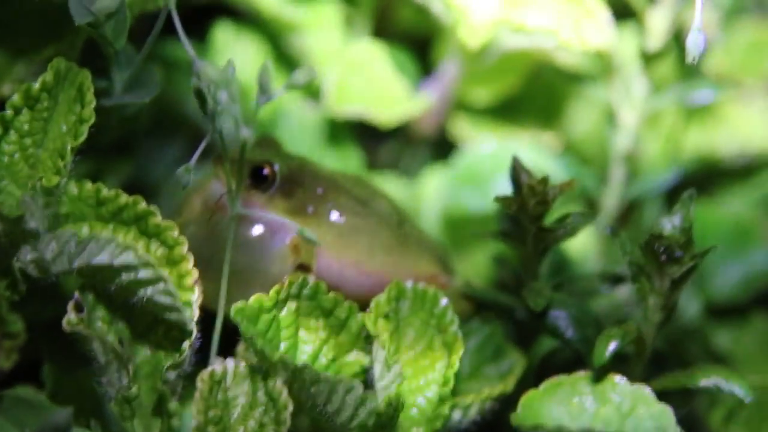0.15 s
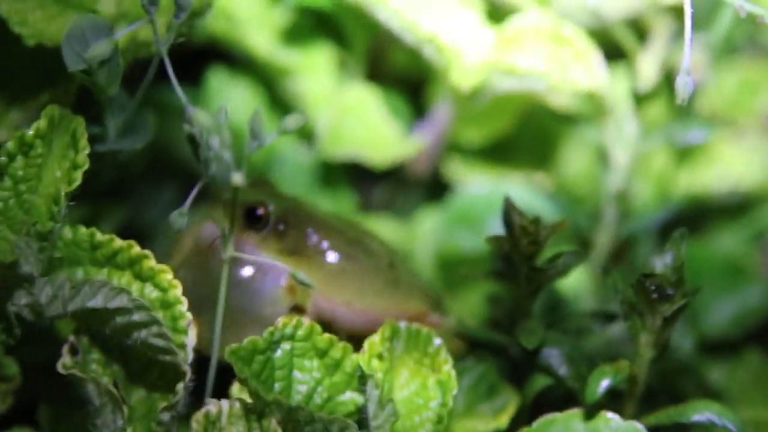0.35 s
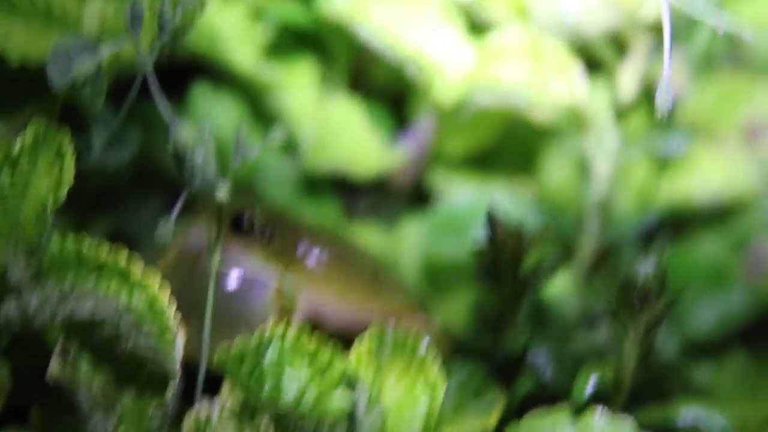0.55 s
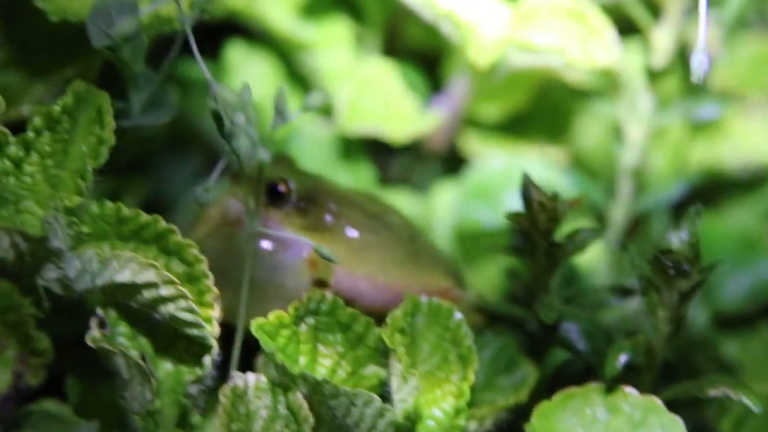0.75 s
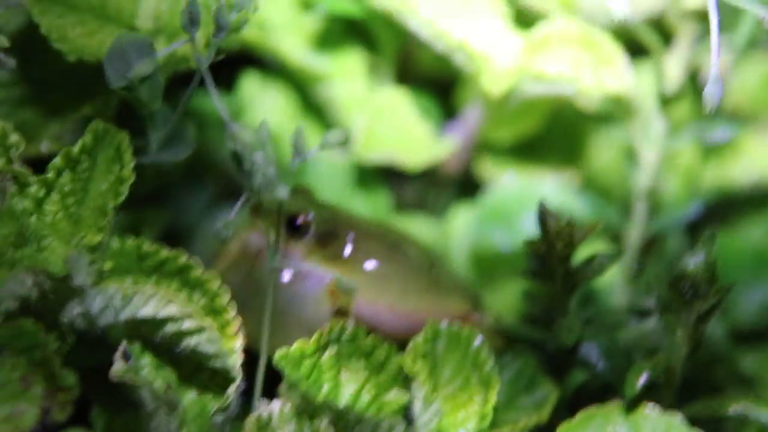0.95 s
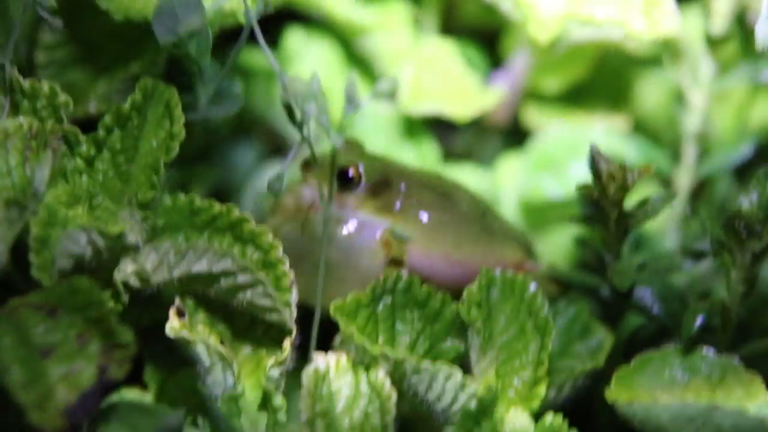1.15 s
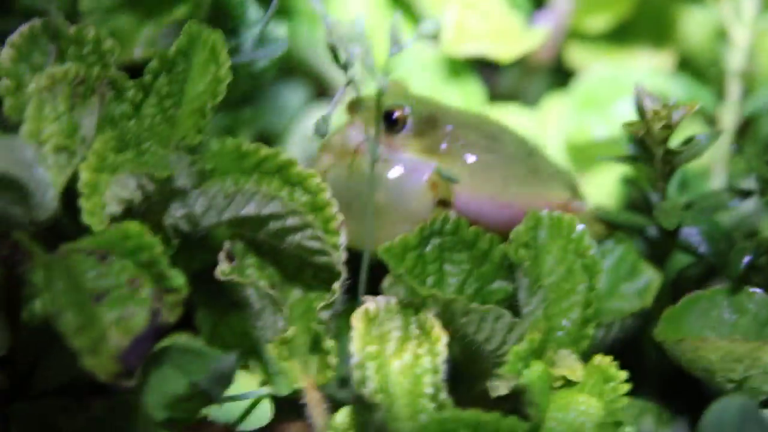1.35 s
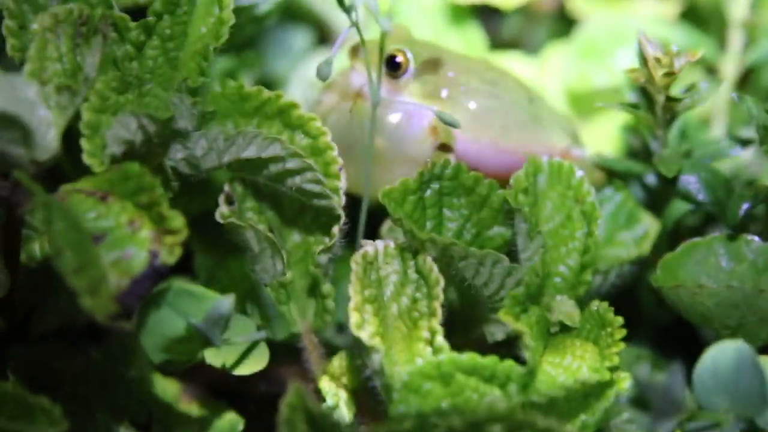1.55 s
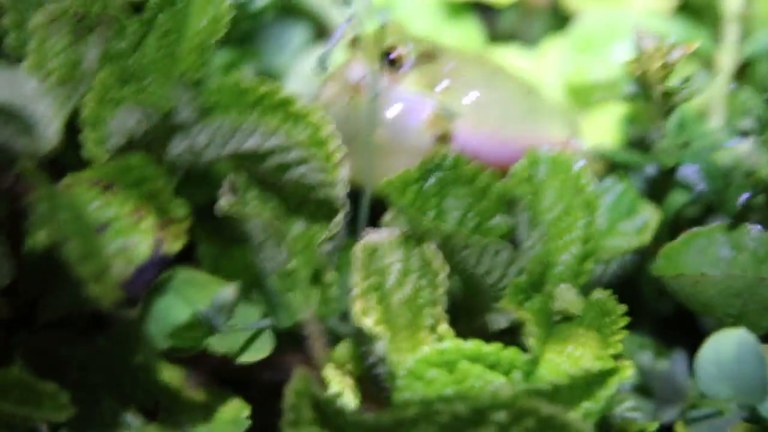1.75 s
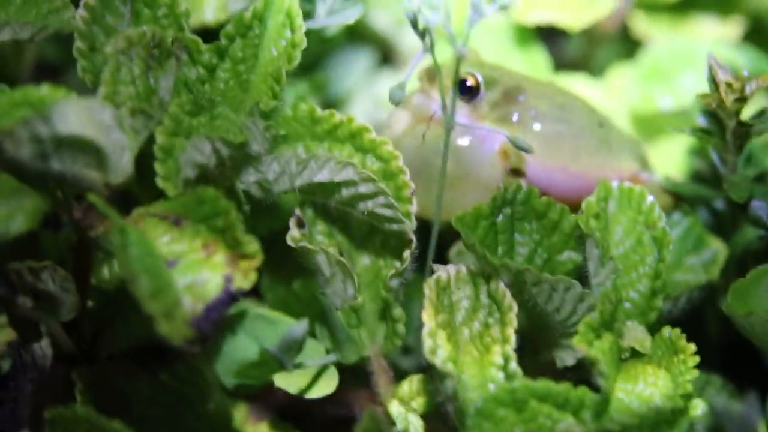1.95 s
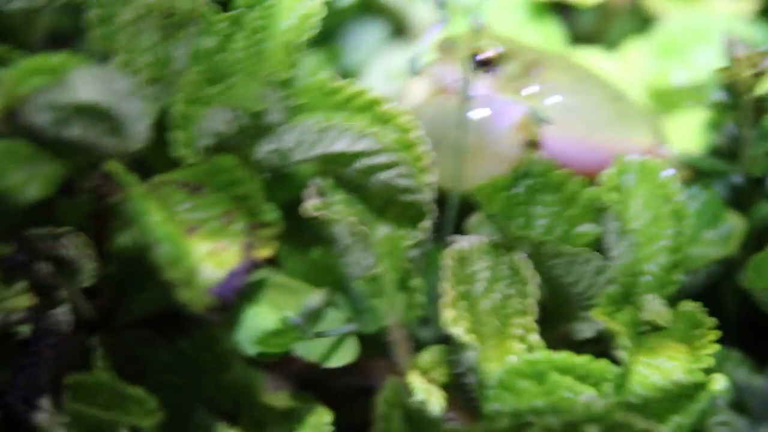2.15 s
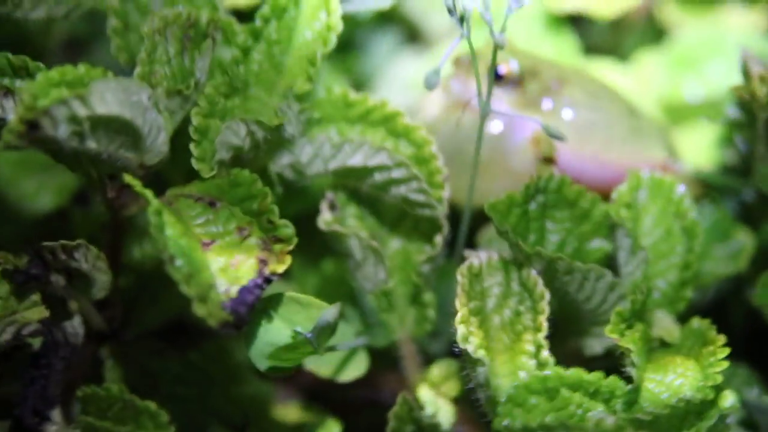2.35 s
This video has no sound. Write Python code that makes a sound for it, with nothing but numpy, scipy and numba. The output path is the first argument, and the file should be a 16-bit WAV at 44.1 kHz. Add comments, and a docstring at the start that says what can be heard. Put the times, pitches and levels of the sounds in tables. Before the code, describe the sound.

A frog gives sharp, high clicking calls up close over faint night frogs and insects.

```python
"""A reed frog calls from the leaves right at the microphone, at night: sharp trains of pulses,
each ringing its vocal sac. Behind it one frog chirps in doubled pulses and another runs on in dry
ticks. A toad snores far off, leaves tick and rustle, and distant frogs and insects make a steady wash.
The first call overloads the recorder, whose gain control ducks the night and slowly lets it back."""
import sys
import numpy as np
from scipy import signal
from scipy.fft import rfft, irfft
from scipy.io import wavfile
from numba import njit

SR = 44100
rng = np.random.default_rng(int(sys.argv[2]) if len(sys.argv) > 2 else 0)


def to_wav(sig):
    """Store sig (one row per channel, or 1-D mono) as 16-bit WAV at the path in sys.argv[1].

    Samples outside -1..1 are clipped; the rate is SR.
    """
    pcm = np.clip(np.atleast_2d(sig), -1, 1) * 32767
    pcm = np.round(pcm).astype(np.int16)
    wavfile.write(sys.argv[1], SR, pcm.T)  # frames by channels


N = 110250

# Reed frog calls, at the microphone and farther off. Each row: start and length in seconds, level in dB,
# pitch and glide in Hz, pulses per second, ring in ms, fade in dB, roughness, overtone boost in dB.
REED_CALLS = [ (0.2495, 0.054, 29.5, 2848, 75, 298, 1.73, -12, 0.16, -1),
              (0.3401, .003, 11, 2700, 15, 290, 2.8, -18, 0.35, 4),
              (0.393, 0.033, 19, 2580, 207, 280, 2.34, -1, 0.21, 5.5),
              (0.4373, 0.0024, 0.5, 2790, -100, 840, 4.5, 10, 0.17, 4),
              (0.52, 0.03, 26, 2830, 21, 380, 1.78, -5.5, 0.09, -8.5),
              (0.567, 0.032, 35.5, 2818, 25, 322, 1.07, -15, 0.08, -3.5),
              (0.8172, 0.023, 22, 2819, 22, 334, 2.55, -2, 0.1, -11),
              (0.8433, 0.027, 32, 2806, 36, 327, 1.1, -9, 0.04, -7),
              (1.2872, 0.012, -1, 2460, 102, 340, 0.99, -2, 1.2, 4),
              (1.3273, 0.025, 9.5, 2517, 147, 320, 4.4, 5, 0.25, -10),
              (2.035, 0.0093, -21, 2500, 0, 330, 1.3, 4, 0.4, 5),
              (2.053, 0.0061, -30, 2620, 2, 160, 1.5, 6, 0, -2),
              (2.125, 0.027, -31.5, 2870, -5, 190, 2.6, -9, 0.4, 0),
              (2.189, 0.039, -28.5, 3030, 2, 320, 1.3, -10, 0.4, -3),
              (2.27, 0.013, -27, 3010, -10, 490, 1.6, 0, 0.4, 0)]
# Harmonics 2 to 5 of a call, in dB before its overtone boost.
REED_HARMONICS_DB = [-34, -42, -44.5, -47]
# A last weak pulse as the throat shuts. Each row: start in seconds, level in dB, pitch in Hz.
CLOSING_PULSES = [(0.3058, 9.5, 2960), (0.5984, 8, 2827), (0.8729, 11.5, 2830)]
# The rasp on the calls. Each row: frequency in Hz, relative level in dB.
RASP_SPECTRUM = [(300, -14.5), (1500, -8), (3000, 15.5), (4300, 3.5), (5600, -1.5), (7000, -5.5),
                 (9500, -8), (14500, -18.5), (17000, -35)]
# The second frog's doubled chirps. Each row: start in seconds, level in dB.
CHIRPS = [(0.6148, -8.5), (0.6427, -10), (0.672, -7), (0.697, -11.5), (0.7147, -10), (0.7342, -9),
          (0.753, -14.5), (0.7734, -10.5), (0.796, -8.5), (0.879, -12), (.898, -10), (0.916, -13.5),
          (0.9317, -12), (.949, -17.5), (.9584, -14.5), (.9708, -14.5), (0.9813, -13), (0.9886, -8),
          (0.9986, -14)]
# The rattle on those chirps. Each row: frequency in Hz, relative level in dB.
RATTLE_SPECTRUM = [(500, -22), (1500, -6), (2300, 0), (4000, -12), (4600, -26), (10000, -27), (16000, -50)]
# The third frog's dry ticks. Each entry: start in seconds.
TICK_STARTS = [1.8488, 1.8745, 1.8986, 1.9228, 1.9451, 1.9705, 1.993, 2.017, 2.042, 2.0659, 2.091, 2.1147,
               2.136, 2.156, 2.179, 2.201, 2.2209, 2.2413, 2.2622, 2.2832, 2.3035, 2.325, 2.3438, 2.3609,
               2.3752, 2.39, 2.4058, 2.4212, 2.439, 2.4564, 2.473, 2.492]
# Its run grows louder. Each row: time in seconds, level in dB.
TICK_LEVELS = [(1.85, -24.5), (2.1, -20.5), (2.33, -18.5), (2.45, -15), (2.5, -15.5)]
# The colour of its ticks. Each row: frequency in Hz, relative level in dB.
TICK_SPECTRUM = [(400, -30), (1300, -22.5), (1650, -2), (1880, -3), (2120, -10), (2600, -6.5), (3100, -10),
                 (4000, -18.5), (4600, -34.5), (9000, -42), (17000, -82)]
# The far toad. Each row: start, end and first pulse gap in seconds, full level in dB, swell in seconds.
SNORE_BOUTS = [(0.013, .3, 0.048, -31.5, 0.0041), (0.725, 1.43, 0.058, -28.5, 0.022),
               (1.799, 2.5, .054, -34, 0.088)]
# The broad croak in each toad pulse. Each row: frequency in Hz, relative level in dB.
CROAK_SPECTRUM = [(300, -34), (450, -18.5), (525, -9), (620, -4.5), (760, -18), (950, 0), (1100, 0.5),
                  (1280, -2), (1550, 7.5), (1750, -4), (1920, -5.5), (2150, -16), (3500, -34.5)]
# The tones each toad pulse rings. Each row: pitch in Hz, relative level in dB, rise and decay in seconds.
TOAD_TONES = [(530.4, -5.5, 0.014, 0.0049), (1043.6, -9, 0.0017, 0.014), (1166, -12, 0.0081, .014),
              (1420, -1, .016, 0.02), (1512, -11, .005, .014), (2690, -16, .008, .014)]
# Single leaf ticks. Each row: start in seconds, level in dB.
LEAF_SNAPS = [(0.0269, -28), (0.1043, -35), (1.23, -27), (1.2416, -42), (1.2745, -31), (1.2822, -22.5),
              (1.305, -33), (1.309, -24), (1.387, -25), (1.4671, -24), (1.5485, -27.5), (1.6213, -37),
              (2.1107, -31.5), (2.266, -33.5), (2.3462, -34)]
# Their colour. Each row: frequency in Hz, relative level in dB.
LEAF_SPECTRUM = [(300, -57), (2000, 18.5), (4200, 7.5), (6000, 2), (10000, 2.5), (15000, -19), (16500, -34)]
# One soft rustle in the leaves. Each row: time in seconds, level in dB.
RUSTLE_LEVELS = [(1.3, -70.5), (1.58, -50.5), (1.7, -42), (1.76, -50.5), (1.81, -45), (1.9, -59),
                 (2.12, -57), (2.5, -62.5)]
# Its colour. Each row: frequency in Hz, relative level in dB.
RUSTLE_SPECTRUM = [(1000, -16.5), (4500, -5), (8000, -1), (11000, -5), (15000, -11.5), (16500, -48.5)]
# The wash of distant frogs, insects and rumble. Each row: frequency in Hz, relative level in dB.
NIGHT_SPECTRUM = [(20, -28), (55, -3.5), (110, -0.5), (200, 3), (350, -4.5), (750, -8), (1400, -4),
                  (2100, -13), (2700, -5), (3500, -18), (4400, -21.5), (5100, -25.5), (5900, -28.5),
                  (11500, -33.5), (15500, -41.5), (16500, -62.5)]
# Thin whistles. Each row: start and length in seconds, lowest pitch and bend scale in Hz, level in dB.
HIGH_WHISTLES = [(0.993, 0.058, 12700, 2900, -55), (1.141, 0.1, 10580, 2010, -55),
                 (2.189, 0.055, 11050, 3820, -47), (2.348, 0.055, 11150, 2800, -49)]

PULSE_ROUNDING = 1.6  # the near frogs' pulses die away in a half bell shape


def reed_call(length, db, hz, glide_hz, rate, ring_ms, fade_db, roughness, overtones_db):
    """A quick train of rounded pulses, each ringing the vocal sac; rough calls slip out of phase."""
    accent_db, first_lag_s, close_s = 4.5, 0.00015, 0.012  # the first pulse is stronger, its gap longer
    bend_rad, flat_hz = 0.079, 45  # each pulse pushes its phase and rings below the call's pitch
    throat_hz, throat_db = 2014, -2  # a lower ring that rough calls excite
    t = np.arange(0, length + .015, 1 / SR)
    slips = np.pi * roughness * rng.standard_normal(32)
    sac, throat = np.zeros(len(t), complex), np.zeros(len(t))
    for k, at in enumerate(np.arange(0, length, 1 / rate)):
        age = t - at - first_lag_s * (k > 0)
        pulse = swell(age, 0.0013, ring_ms / 1000, PULSE_ROUNDING)
        closing = min((length - at) / close_s, 1)
        strength = amp(fade_db * at / length - accent_db) * closing if k else 1
        sac += strength * pulse * np.exp(1j * (slips[k] + bend_rad * pulse - 2 * np.pi * flat_hz * age))
        throat_ring = swell(age, 0.0022, 0.00053) * np.sin(2 * np.pi * throat_hz * age)
        throat += strength * (1 - at / length) * throat_ring
    phase = sweep_phase(hz + glide_hz * np.minimum(t / length, 1)) + np.angle(sac)
    overtones = sum(amp(h + overtones_db) * np.sin(k * phase) for k, h in enumerate(REED_HARMONICS_DB, 2))
    squeak = amp(-53.5) * np.sin(sweep_phase(13400 + 2320 * np.exp(-t / 0.036)))  # thin and falling
    voice = abs(sac) * (np.sin(phase) + overtones + squeak)
    return amp(db) * (voice + roughness * amp(throat_db) * throat)


def rasp(repeat_hz=315, feedback=.7):
    """Noise that partly repeats from pulse to pulse, so that it rings in fine overtones."""
    delay = np.exp(2j * np.pi * np.fft.rfftfreq(N, 1 / SR) / repeat_hz)
    x = irfft(rfft(noise(RASP_SPECTRUM)) / abs(1 - feedback * delay), N)
    return x / x.std()


def reed_frogs(rasp_db=-26.5):
    """Calls close up and farther off, weak pulses as the throat shuts, and a faint rasp on both."""
    out, t = np.zeros(N), np.arange(SR // 100) / SR
    for start, *row in REED_CALLS:
        add(out, start, reed_call(*row))
    for start, db, hz in CLOSING_PULSES:
        add(out, start, amp(db) * swell(t, .0018, .0012, PULSE_ROUNDING) * np.sin(2 * np.pi * hz * t))
    return out + amp(rasp_db) * abs(out) * rasp()


def chirp(hz, drop_hz, drop_s, rise_s, decay_s):
    """One rounded chirp whose pitch falls quickly onto the ring of the throat."""
    t = np.arange(SR // 60) / SR
    pitch = hz * (1 + 0.031 * rng.standard_normal()) + drop_hz * np.exp(-t / drop_s)
    return swell(t, rise_s, decay_s, PULSE_ROUNDING) * np.sin(sweep_phase(pitch))


def chirping_frog(gap_s=0.0044, rattle_db=-11):
    """The second frog chirps in doubled pulses, with a rattle of noise riding on each."""
    out = np.zeros(N)
    for start, db in CHIRPS:
        hz = 2307 - 280 * np.exp(-(start - CHIRPS[0][0]) / .07)  # the first chirps start lower
        first = chirp(hz, drop_hz=3040, drop_s=0.00058, rise_s=0.0013, decay_s=0.0025)
        second = chirp(hz, drop_hz=403, drop_s=0.00044, rise_s=0.00079, decay_s=0.0035)
        add(out, start, amp(db) * first)
        add(out, start + gap_s, amp(db - 2.5) * second)
    envelope = abs(signal.hilbert(out))
    return out + amp(rattle_db) * envelope * noise(RATTLE_SPECTRUM)


def dry_click(spectrum):
    """A sharp click of unit peak, ringing with a spectrum of (Hz, dB) points."""
    log_gain = np.log(spectrum_gain(abs(np.fft.fftfreq(2048, 1 / SR)), spectrum))
    click = np.fft.ifft(np.exp(signal.hilbert(log_gain).conj())).real  # minimum phase: energy up front
    return click / abs(click).max()


def ticking_frog(uneven_db=0.7, ring_db=-7):
    """The third frog runs on in dry ticks, no two alike; its throat rings after each."""
    out = np.zeros(N)
    for start in TICK_STARTS:
        db = np.interp(start, *np.transpose(TICK_LEVELS)) + uneven_db * rng.standard_normal()
        colour = [(hz, level + 2.3 * rng.standard_normal()) for hz, level in TICK_SPECTRUM]
        add(out, start, amp(db) * dry_click(colour))
        throat = chirp(1870, drop_hz=890, drop_s=0.00041, rise_s=0.001, decay_s=0.0025)
        add(out, start, amp(db + ring_db) * throat)
    return out


def far_toad(quicken_s=.0009, croak_db=-2, pitch_spread=.005):
    """Slow, quickening pulses smeared by distance: each is a broad croak with a few ringing tones."""
    t = np.arange(SR // 5) / SR
    croak_envelope, tones = np.zeros(N), np.zeros(N)
    for start, end, gap, db, swell_s in SNORE_BOUTS:
        times = start + np.cumsum([0, *(gap - quicken_s * np.arange(20))])
        scatter = rng.standard_normal((len(times), len(TOAD_TONES), 2))
        for at, draws in zip(times[times < end], scatter):
            strength = amp(db) * (1 - 1.3 * np.exp(-(at - start + 0.084) / swell_s))
            add(croak_envelope, at, strength * swell(t, 0.0024, 0.035))
            for (hz, tone_db, rise, decay), (waver, uneven_db) in zip(TOAD_TONES, draws):
                tone = swell(t, rise, decay) * np.sin(2 * np.pi * hz * (1 + pitch_spread * waver) * t)
                add(tones, at, strength * amp(tone_db + uneven_db) * tone)
    return amp(croak_db) * croak_envelope * noise(CROAK_SPECTRUM) + tones


def leaves(grain_db=4):
    """Single leaf ticks and one soft, grainy rustle around the microphone."""
    snaps, t = np.zeros(N), np.arange(SR // 40) / SR
    for start, db in LEAF_SNAPS:
        add(snaps, start, amp(db) * swell(t, 0.0014, 0.0028))
    knots = np.arange(0, N, 128)
    grains = amp(grain_db * np.interp(np.arange(N), knots, rng.standard_normal(len(knots))))
    rustle = amp(np.interp(np.arange(N) / SR, *np.transpose(RUSTLE_LEVELS)))
    return snaps * noise(LEAF_SPECTRUM) + rustle * grains * noise(RUSTLE_SPECTRUM)


def night(wash_db=-42, insect_db=-65.5, insect_hz=5020, insect_width_hz=220):
    """The distant wash, a far chorus of insects and, high above, thin whistles that dip and rise."""
    insects = shaped_noise(np.exp(-((np.fft.rfftfreq(N, 1 / SR) - insect_hz) / insect_width_hz) ** 2))
    out = amp(wash_db) * noise(NIGHT_SPECTRUM) + amp(insect_db) * insects
    for start, length, hz, bend_hz, db in HIGH_WHISTLES:
        progress = np.arange(0, length, 1 / SR) / length
        jitter_hz = 900 * rng.standard_normal(N)[:len(progress)]
        pitch = hz + bend_hz * (1.2 * progress - .4) ** 2 + jitter_hz
        add(out, start, amp(db) * np.sin(np.pi * progress) * np.sin(sweep_phase(pitch)))
    return out


def plant_echo(x, db=-32.5, t60_s=0.33):
    """A faint diffuse echo from the plants around."""
    t = np.arange(SR) / SR
    tail = rng.standard_normal(SR) * amp(-60 * t / t60_s) * np.minimum(t / 0.014, 1)
    return amp(db) * signal.fftconvolve(x, tail / np.linalg.norm(tail))[:N]


def amp(db):
    """Decibels to gain."""
    return 10 ** (np.asarray(db) / 20)


def add(mix, start_s, sound):
    """Mixes a sound in at its start time."""
    part = mix[max(round(start_s * SR), 0):][:len(sound)]
    part += sound[:len(part)]


def swell(t, rise_s, decay_s, rounding=1):
    """A rounded rise, then a decay: exponential, or bell-shaped as rounding nears 2."""
    attack = np.sin(np.pi / 2 * np.clip(t / rise_s, 0, 1)) ** 2
    return attack * np.exp(-(np.maximum(t - rise_s, 0) / decay_s) ** rounding)


def sweep_phase(hz):
    """Running phase of a moving pitch, in radians."""
    return 2 * np.pi * np.cumsum(hz) / SR


def spectrum_gain(hz, spectrum):
    """Gain at each frequency, from (Hz, dB) points joined on a log frequency axis."""
    points_hz, db = np.transpose(spectrum)
    return amp(np.interp(np.log(hz + 1), np.log(points_hz), db))


def shaped_noise(gain):
    """Unit noise with the given gain per frequency bin."""
    x = irfft(rfft(rng.standard_normal(N)) * gain, N)
    return x / x.std()


def noise(spectrum):
    """Unit noise with a spectrum of (Hz, dB) points."""
    return shaped_noise(spectrum_gain(np.fft.rfftfreq(N, 1 / SR), spectrum))


def scene():
    """All the voices of the night at one microphone in the leaves."""
    frogs = reed_frogs() + chirping_frog() + ticking_frog()
    return (frogs + plant_echo(frogs) + far_toad() + leaves() + night())[None]


@njit
def gain_control(x):
    """Clips at full scale, turns down while the output is over the threshold, and creeps back."""
    threshold, duck_rate = 0.12, 5303  # the rate is in dB per second per unit over the threshold
    creep_db_per_s, recover_s = 21, 1.12
    out, db = np.zeros(len(x)), 0.
    for i in range(len(x)):
        out[i] = min(max(x[i] * 10 ** (db / 20), -1.), 1.)
        duck = duck_rate * max(abs(out[i]) - threshold, 0.)
        recovery = creep_db_per_s - db / recover_s  # deep ducks recover faster
        db = min(db + (recovery - duck) / SR, 0.)
    return out


def record(dry, mic_top_hz=16400, band_edge_hz=21400):
    """The recorder overloads and ducks on the close calls; the treble rolls off up to its band limit."""
    ducked = gain_control(dry[0])
    softened = signal.lfilter(*signal.butter(2, mic_top_hz, fs=SR), ducked)
    return signal.oaconvolve(softened, signal.firwin(255, band_edge_hz, fs=SR), "same")[None]


dry = scene()
out = record(dry)
to_wav(out)
```